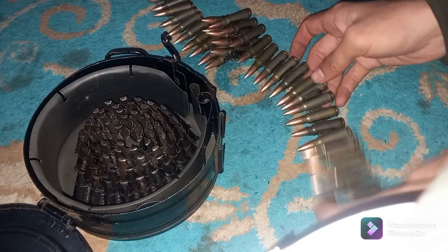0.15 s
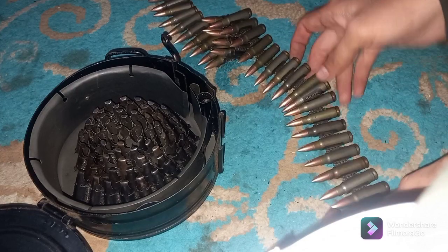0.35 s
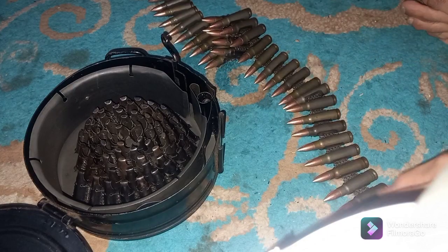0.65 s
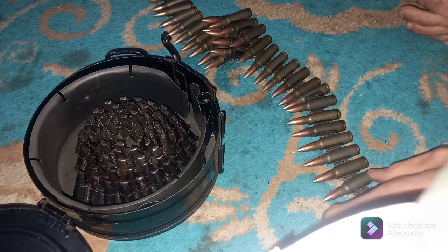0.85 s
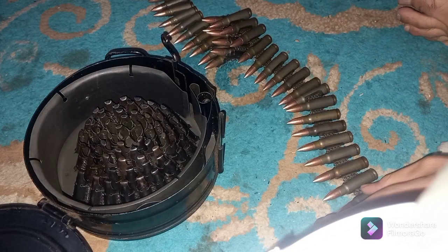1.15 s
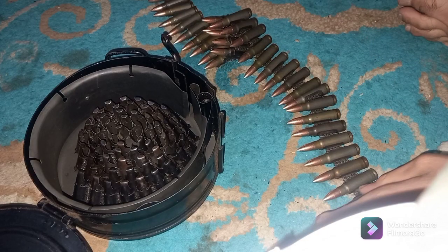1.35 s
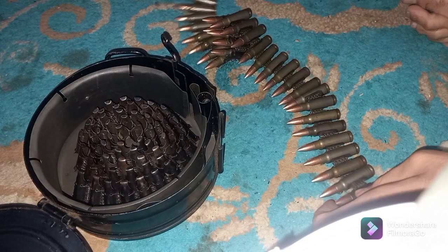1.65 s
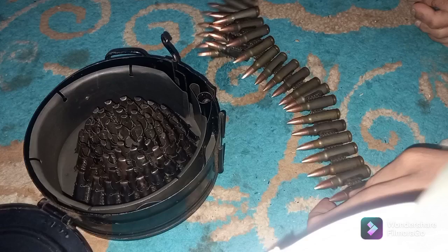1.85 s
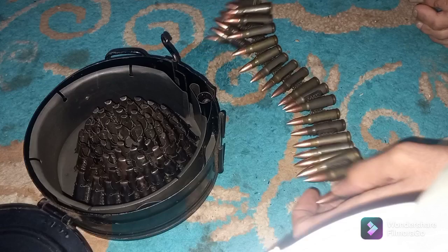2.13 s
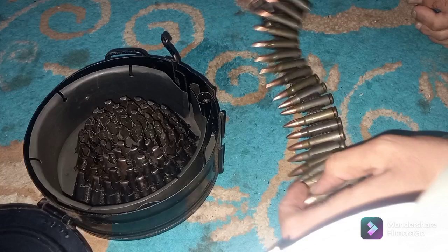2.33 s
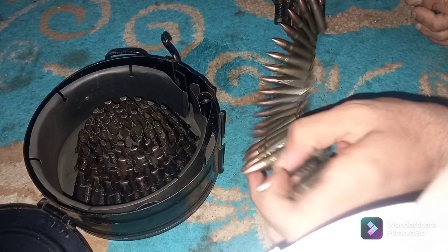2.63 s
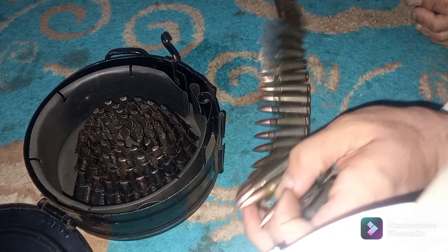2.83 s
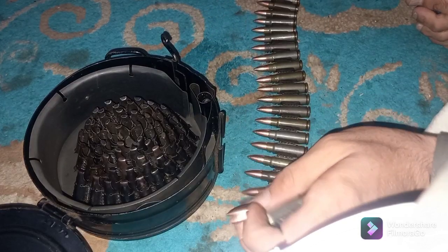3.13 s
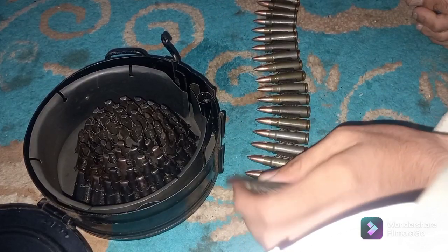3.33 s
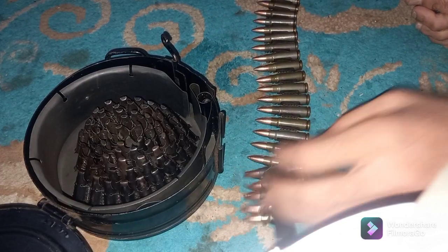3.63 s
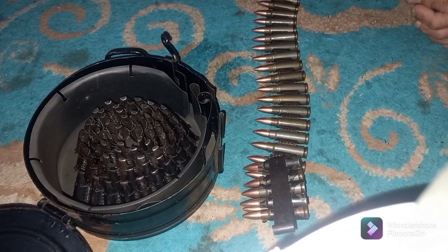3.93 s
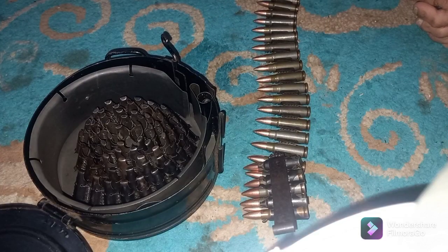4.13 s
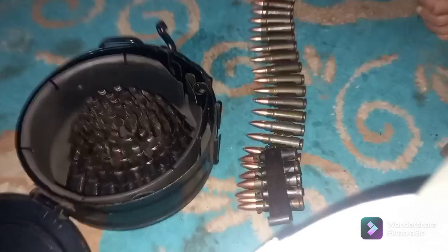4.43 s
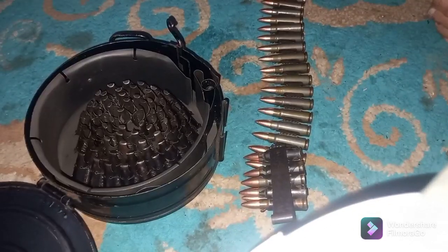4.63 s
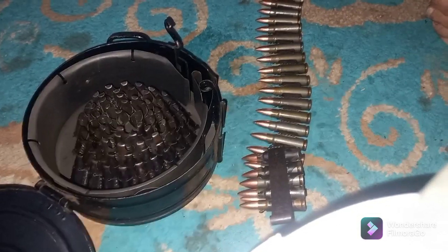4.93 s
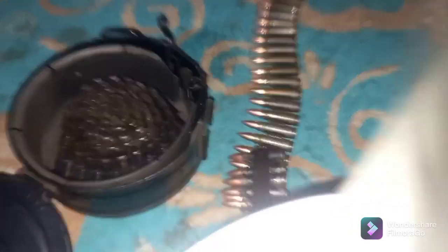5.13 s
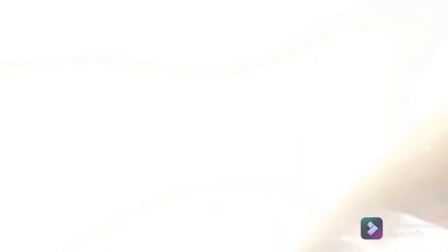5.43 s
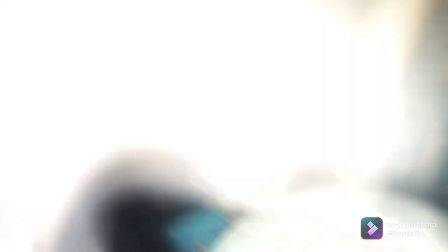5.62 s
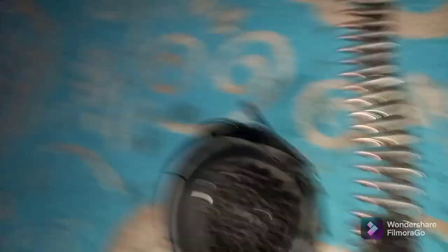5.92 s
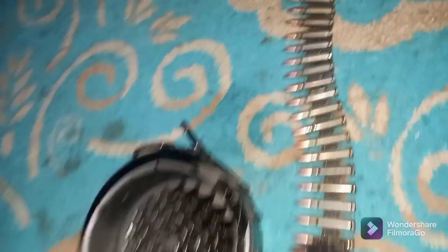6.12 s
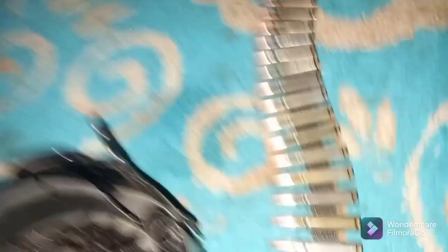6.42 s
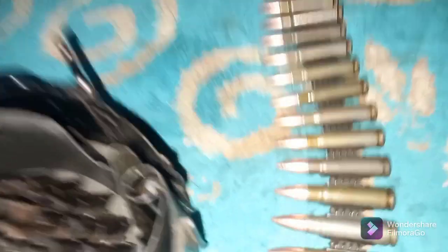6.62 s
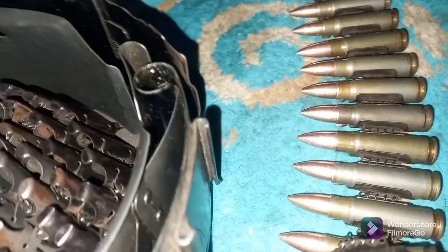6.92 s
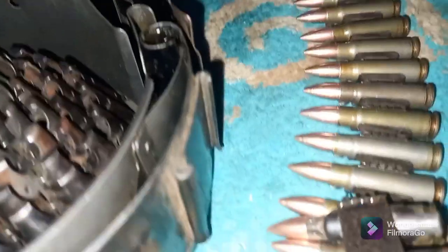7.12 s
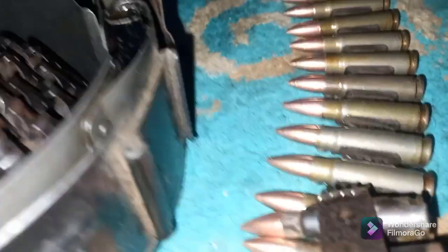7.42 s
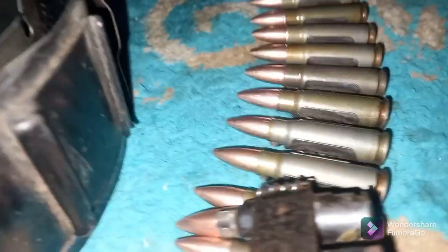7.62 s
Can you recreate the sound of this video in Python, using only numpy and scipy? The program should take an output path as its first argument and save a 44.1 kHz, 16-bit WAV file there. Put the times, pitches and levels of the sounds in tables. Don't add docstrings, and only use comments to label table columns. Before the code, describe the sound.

Sparse tiny metallic clinks grow into a jingling fold and soft carpet brush, before sharp plastic taps, thumps and scratchy handling, then quiet hum.

```python
import sys
import numpy as np
from scipy import signal
from scipy.fft import rfft, irfft
from scipy.io import wavfile

SR = 44100
rng = np.random.default_rng(int(sys.argv[2]) if len(sys.argv) > 2 else 0)


def bounce(signal):
    frames = np.transpose(np.atleast_2d(signal))
    limited = np.clip(frames, -1, 1)
    pcm = np.round(limited * 32767).astype(np.int16)
    wavfile.write(sys.argv[1], SR, pcm)


def natural_amplitude(level_db):
    exponent = np.asarray(level_db, float) / 20
    return 10 ** exponent


N = 342331
T = np.arange(N) / SR

# t/s, peak level/dB, shell f/Hz, link over shell level/dB, left minus right level/dB
DRAG_CLINKS = [(0.134, -73, 5900, -22, -12), (0.191, -68, 5600, 13.5, -25), (0.2765, -66, 6100, -6, -14),
               (0.2823, -56, 5700, -7, -13), (0.349, -74, 5740, -10, -12), (0.3013, -67, 5600, 11.5, -19),
               (1.1663, -69.5, 6400, -2, -4), (1.454, -64, 6700, 5.5, -5), (1.499, -63, 5340, 11.5, -7),
               (1.549, -73, 5030, 7, -2), (1.689, -71, 5440, 2, -4), (1.738, -72, 5900, 5, -13),
               (1.781, -62, 6540, 0, -17), (1.8255, -71, 6650, 8.5, -22), (1.877, -66, 6630, 4, -10),
               (1.977, -67.5, 6600, -6, -24), (1.993, -66.5, 5440, 3.5, -22), (2.125, -78, 6300, 2.5, -29),
               (2.239, -61.5, 6030, -30, -17), (2.42, -73, 5970, -2, -12), (2.467, -71, 5640, 4, -16),
               (2.49, -72, 5600, 6, -12), (2.64, -70, 5800, -15, -11), (2.78, -73, 4800, -20, -8),
               (2.0225, -74, 5560, 5, -12)]
FOLD_CLINKS = [(2.9183, -65.5, 6000, 1, -17), (2.945, -64, 5400, -21, -5), (2.971, -51.5, 5600, 4.5, -10.5),
               (2.983, -55.5, 5660, 4.5, -10), (2.9975, -57, 5850, 3.5, -14), (3.009, -68, 5340, -1, 4),
               (3.2253, -66.5, 5500, 4, -21), (3.275, -64.5, 5900, 7, -26), (3.288, -62, 4270, 4, 4),
               (3.2956, -56.5, 5370, 6.5, -10), (3.468, -71, 6080, -6, -21), (3.4991, -59.5, 6400, 2, -15),
               (3.5162, -57, 6400, 5.5, -9), (3.562, -58.5, 6130, 4, -11), (3.5946, -53, 4900, 1.5, -9.5),
               (3.651, -56, 4130, -2, 1), (3.657, -52.5, 5800, 3.5, -3), (3.6686, -49.5, 4000, 3, -1),
               (3.704, -55, 5110, 14, -7), (3.7186, -52.5, 4460, 16.5, -9.5),
               (3.736, -55.5, 5000, 7.5, -5.5), (3.756, -60, 4530, 2, 3), (3.789, -54, 4100, 7.5, -9.5),
               (3.9, -69.5, 4750, 6.5, -7), (3.9889, -65, 5990, -4, -12), (4.1261, -72, 5090, -6, -12),
               (4.1551, -68, 3300, -6, -9) , (4.188, -64, 5830, 1, -19)]
SQUARE_HIT_DB = 5.5
BELT_PAN_DB = -6


def unit(x):
    return x / np.sqrt(np.mean(x ** 2))


def peak(x, db):
    return x * natural_amplitude(db) / np.abs(x).max()


def band(x, hz, width, order=2):
    edges = np.clip([hz - width / 2, hz + width / 2], 20, .48 * SR)
    return signal.sosfilt(signal.butter(order, edges, "bandpass", fs=SR, output="sos"), x)


def on_log(table, hz):
    f, v = np.transpose(table)
    return np.interp(np.log(hz + 1), np.log(f), v)


def decay(t60, size):
    return np.exp(-np.log(1000) * np.arange(size) / SR / max(t60, 1 / 1000))


def ring(hz, t60, size):
    return np.sin(2 * np.pi * hz * np.arange(size) / SR) * decay(t60, size)


def burst(t60, size):
    return rng.standard_normal((2, size)) * decay(t60, size)


def sides(pan_db):
    return natural_amplitude(np.array([[1], [-1]]) * pan_db / 2)


def add(out, x, s, pan_db):
    i = int(s * SR)
    out[:, i:i + x.shape[-1]] += (x * sides(pan_db))[:, :N - i]


def grains(rate, spread_db, smear_s):
    happens = rng.random((2, N)) < rate / SR
    size_db = spread_db * np.minimum(rng.exponential(size=(2, N)), 4.5)
    tail = signal.lfilter([1], [1, -np.exp(-1 / (smear_s * SR))], happens * natural_amplitude(size_db))
    return unit(tail * rng.standard_normal((2, N)))


def swell(start, top, end, rise_db, fall_db, edge_s=0.0046):
    gain, span = np.zeros(N), slice(int(start * SR), int(end * SR))
    t = T[span]
    inside = np.clip(np.minimum(4 * (t - start), end - t) / edge_s, 0, 1)
    gain[span] = inside * natural_amplitude(np.interp(t, [start, np.clip(top, start, end), end], [-rise_db, 0, -fall_db]))
    return gain


def clinks():
    out = np.zeros((2, N))
    for s, db, shell_hz, link_db, pan_db in DRAG_CLINKS + FOLD_CLINKS:
        glancing = link_db < SQUARE_HIT_DB
        link_hz = 11110 * np.exp(0.13 * rng.uniform(-1.3, 2.3) * glancing)
        chatter = burst(0.021, size=1800)
        shell = signal.fftconvolve(chatter, ring(shell_hz, .008, size=900)[None])
        link = signal.fftconvolve(chatter, ring(link_hz, 0.0054, size=900)[None])
        crack = burst(0.0042, size=shell.shape[1])
        low = peak(shell, -3) + peak(band(crack, 5300, 3400, order=4), -3.5)
        low = band(low, 5500, 4400, order=3) + peak(band(crack, 1100, 1400), -33)
        top = peak(link, -4.5 - 5.5 * glancing) + peak(band(crack, 12060, 6800, order=3), -2.0)
        add(out, natural_amplitude(db + 10.5) * (natural_amplitude(2.0) * low + natural_amplitude(link_db) * top), s, pan_db)
    return out


def belt_body(x, lo, hi, rough_db):
    # f/Hz, width/Hz, level/dB
    belt_modes = [(3700, 170, -45), (5110, 35, 12), (5900, 820, 38), (9450, 150, -34), (10800, 320, -3),
                  (12100, 570, 21.5), (12900, 100, 10), (13730, 110, -28), (14300, 30, -19),
                  (14400, 1100, 19)]
    modes = sum(natural_amplitude(db) * band(x, hz, width, order=1) * np.sqrt(500 / width)
                for hz, width, db in belt_modes if lo < hz < hi)
    rattle = unit(band(x, (lo + hi) / 2, hi - lo, order=2))
    return unit(unit(modes) + natural_amplitude(rough_db) * rattle)


def jingle():
    # start t/s, strongest t/s, end t/s, level/dB, links over shells level/dB
    moves = [(0.187, 0.195, 0.26, -74, 4), (0.272, 0.285, 0.38, -70, 2), (1.44, 1.455, 1.64, -78, 3),
             (1.6, 1.74, 1.775, -72, 0), (1.775, 1.82, 1.86, -69, 2), (1.7, 1.9, 2.2, -72, -14),
             (1.868, 1.88, 1.895, -66, 0), (1.96, 1.99, 2.02, -66, -2), (2.0, 2.29, 2.42, -68, -10),
             (2.39, 2.482, 2.62, -70, -2), (2.55, 2.88, 2.91, -70, -20), (2.91, 2.984, 3.03, -61, 0),
             (3.0, 3.02, 3.12, -70, -6), (3.2, 3.235, 3.27, -64, -1), (3.27, 3.3, 3.35, -60, 0),
             (3.494, 3.5, 3.63, -64, 2), (3.615, 3.655, 3.69, -57, 2), (3.7, 3.73, 3.78, -60, -2),
             (3.81, 3.825, 3.85, -68, 4), (4.165, 4.196, 4.23, -60, 5)]
    # start t/s, strongest t/s, end t/s, level/dB
    brushes = [
        (2.252, 2.605, 2.92, -80),
    ]
    patter = grains(rate=900, spread_db=3.0, smear_s=0.0022)
    low, top = belt_body(patter, 3200, 8130, 0.17), belt_body(patter, 8300, 18000, 6.0)
    shakes = [(s, s, s + 0.025, db - 17, min(link_db, 4))
              for s, db, _, link_db, _ in DRAG_CLINKS + FOLD_CLINKS]
    shells = links = 0
    for start, most, end, db, link_db in moves + shakes:
        move = swell(start, most, end, 11, 13.5) * natural_amplitude(db)
        shells, links = shells + move, links + move * natural_amplitude(link_db)
    press = sum(swell(start, most, end, 4.4, 3.9) * natural_amplitude(db) for start, most, end, db in brushes)
    pile = press * unit(band(patter, 1300, 1500))
    return sides(BELT_PAN_DB) * (natural_amplitude(-0.5) * shells * low + natural_amplitude(-3.5) * links * top + pile)


def skid():
    scrape = (3.618, 3.66, 3.695, -56, 4450, 3550, 450)
    start, most, end, db, first_hz, last_hz, width = scrape
    hz = np.interp(T, [start, end], [first_hz, last_hz])
    lowpass = signal.butter(2, width / 2, fs=SR, output="sos")
    grit = unit(signal.sosfilt(lowpass, rng.standard_normal((2, N))))
    return swell(start, most, end, 5.5, 3.5) * natural_amplitude(db) * grit * np.sin(2 * np.pi * np.cumsum(hz) / SR)


def drag():
    slides = [
        (1.62, 1.85, 1.5, -77),
        (2.053, 2.3, 3.2, -78),
        (2.5, 2.748, 2.98, -84),
        (3.0, 3.05, 3.22, -86),
    ]
    hiss = unit(band(grains(rate=5000, spread_db=6.0, smear_s=0.0035), 5700, 3300, order=3))
    press = sum(swell(start, most, end, 7.3, 12.0, edge_s=0.046) * natural_amplitude(db) for start, most, end, db in slides)
    return sides(BELT_PAN_DB) * press * hiss


def sweep():
    strokes_away = [
        (3.65, 3.75, 3.8, -68),
        (3.783, 3.964, 4.06, -65),
        (4.038, 4.173, 4.26, -70.5),
    ]
    # f/Hz, width/Hz, level/dB
    pile_bands = [(707, 210, -10), (1250, 530, -6.5), (2830, 1300, -11), (5000, 4230, 2),
                  (12370, 7700, -6.5)]
    fibres = grains(rate=5200, spread_db=-4.0, smear_s=0.003)
    wash = unit(sum(natural_amplitude(db) * unit(band(fibres, hz, width)) for hz, width, db in pile_bands))
    press = sum(swell(start, most, end, 6.4, 6.5, edge_s=0.036) * natural_amplitude(db)
                for start, most, end, db in strokes_away)
    return sides(-11.5) * press * wash


def cavities(slip, port):
    return [natural_amplitude(db) * unit(band(slip, hz, width, order=3)) for hz, width, db in port]


def rub():
    # f/Hz, width/Hz, level/dB
    left_port = [(4380, 1465, 0.5), (2030, 1500, -5), (12400, 5600, -28)]
    right_port = [(4800, 2300, -12), (1790, 2500, 0), (11900, 6700, -10)]
    # start t/s, firmest t/s, end t/s, level/dB, left minus right level/dB
    strokes = [(4.5, 4.6, 4.638, -51.5, 10), (4.71, 4.75, 4.795, -63, -12), (4.828, 4.845, 4.865, -62, -12),
               (4.88, 4.936, 4.975, -69, -8), (4.975, 4.992, 5.012, -59, 8), (5.03, 5.04, 5.08, -65, -6),
               (4.6, 4.66, 5.08, -75, 0), (5.57, 5.6, 5.72, -76, 8), (5.71, 5.72, 5.76, -73, 12),
               (5.775, 5.8, 5.86, -61, 16), (5.843, 5.855, 5.935, -61, 16), (6.235, 6.26, 6.285, -70, 15)]
    grips = [(4.451, 4.453, 4.48, -46, 16), (4.47, 4.48, 4.525, -50, -10), (4.683, 4.686, 4.7, -60, -6),
             (5.15, 5.185, 5.25, -49, 19), (5.285, 5.3, 5.37, -52, 22), (5.487, 5.495, 5.53, -41, 15),
             (5.843, 5.86, 5.92, -64, 8), (5.922, 5.935, 6.03, -46, 10), (6.01, 6.034, 6.06, -50, 17),
             (6.056, 6.07, 6.13, -45.5, 4), (6.1, 6.16, 6.19, -62, 0)]
    # t/s, pressure as level/dB, left minus right level/dB
    palm_slide = [
        (5.076, -58.5, 16),
        (5.1, -48.5, 18),
        (5.125, -40.5, 12.5),
        (5.185, -42, 12.5),
        (5.275, -47, 14),
        (5.3, -49.5, 17.5),
        (5.41, -40.5, 8.5),
        (5.46, -54.5, 17),
        (5.51, -61.5, 20),
        (5.58, -54.5, 18.5),
    ]
    # rise/dB, fall/dB, case over cavity/dB, rumble over cavity/dB
    light, firm = (10, 11, -6.5, -20.5), (13, 22.7, 4.3, 4)

    slip = grains(rate=9600, spread_db=1.5, smear_s=0.0051)
    rumble = unit(band(rng.standard_normal((2, N)), 100, 240)) * natural_amplitude(np.array([[3.0], [-6.0]]))
    ports = np.stack([cavities(slip[0], left_port), cavities(slip[1], right_port)], axis=1)
    judder_db = 2.5 * unit(band(rng.standard_normal((3, 1, N)), 55.07, 70))
    cavity, case, air = ports * natural_amplitude(judder_db)
    air = air * natural_amplitude(np.where(T > 5.57, -6, 0))
    cavity[1] += natural_amplitude(-2.0) * unit(band(slip[1], 5550, 500))
    case[1] += natural_amplitude(-7.5) * unit(band(slip[1], 2200, 510))

    s, db, pan_db = np.transpose(palm_slide)
    palm = swell(s[0], s[0], s[-1], 0, 0) * natural_amplitude(np.interp(T, s, db))
    out = palm * sides(np.interp(T, s, pan_db)) * (cavity + air + natural_amplitude(-4) * case)
    shake = palm * natural_amplitude(-7)
    for touches, (rise_db, fall_db, case_db, rumble_db) in ((strokes, light), (grips, firm)):
        for start, most, end, db, pan_db in touches:
            press = swell(start, most, end, rise_db, fall_db) * natural_amplitude(db)
            out = out + press * sides(pan_db) * (cavity + air + natural_amplitude(case_db) * case)
            shake = shake + press * natural_amplitude(rumble_db)
    keep = np.exp(-1 / (0.023 * SR))
    return out + signal.lfilter([1 - keep], [1, -keep], shake) * rumble


def knocks():
    # t/s, peak level/dB, case f/Hz, dull body relative level/dB, left minus right level/dB
    taps = [(4.4504, -10.5, 4598, -52, 10.5), (4.4757, -28.5, 6000, -2.5, 2.5),
            (4.4835, -37, 1520, -3, 7.5), (4.4893, -39, 3200, -4, 9), (4.527, -29, 4200, -12, -0.5),
            (4.683, -31.5, 5500, -33, 2), (4.83, -49, 5560, -21, 8), (4.9781, -49.5, 4100, -10, 11.5),
            (5.033, -47, 5630, -19, 9.5), (5.077, -46, 4100, -13, 21), (5.1823, -26.5, 3820, -17, 22),
            (5.2815, -25, 1640, -1.5, -6.5), (5.2875, -24, 4200, -38, 15), (5.303, -26.5, 3680, -13, 13.5),
            (5.3297, -38, 4380, 6.5, 11), (5.391, -28, 5030, -40, 25.5), (5.4888, -23, 2200, -14.5, 10.5),
            (5.4928, -27, 3250, -19, 10), (5.517, -42, 4070, -1, 16), (5.2131, -28.5, 4000, -15, 19),
            (5.9207, -18, 4610, -9.5, 18), (5.9245, -17.5, 3720, -9.5, 13.5),
            (5.9853, -42.5, 1600, 4.5, -2), (6.0196, -36.5, 4570, -17.5, 19.5),
            (6.032, -31, 3870, -20, 12.5), (6.044, -40.5, 5500, -20, 11.5), (6.067, -26, 4500, -19.5, 6.5),
            (6.085, -28.5, 4800, -5.5, 9), (6.0552, -17.5, 2150, -1.5, 2), (6.0996, -31, 3650, -1.5, -3),
            (6.1236, -39, 1310, -1.5, 3), (6.1539, -45.5, 1500, 5, -4)]
    out = np.zeros((2, N))
    for s, db, case_hz, body_db, pan_db in taps:
        t60 = 0.004 if body_db < -24 else 0.02
        crack = burst(t60, size=3000)
        case = signal.fftconvolve(burst(0.72 * t60, size=1000), ring(case_hz, 1.2 * t60, size=2001)[None])
        parts = peak(case, -6.5) + peak(band(crack, 3056, 3700, order=3), -2.0)
        top = peak(band(crack, 12000, 12000, order=3), -36.0) * sides(-8)
        body = peak(band(crack[:1], 560, 980), body_db)
        add(out, natural_amplitude(db) * (parts + top + body), s, pan_db)
    return out


def nail_snap():
    # t/s, peak level/dB, left minus right level/dB
    flick = (5.390, -23, -7)
    s, db, pan_db = flick
    out = np.zeros((2, N))
    add(out, peak(band(burst(0.0075, size=2000), 13000, 14000), db), s, pan_db)
    return out


def pings():
    # t/s, f/Hz, peak level/dB, t60/s, left minus right level/dB
    ping_modes = [(4.4501, 4520, -18, 0.003, 10.5), (4.683, 1480, -41, 0.008, -4),
                  (4.84, 2180, -58.5, 0.03, -10), (4.73, 2180, -64, 0.1, -8),
                  (5.9223, 2200, -26, 0.008, 14), (6.126, 1330, -44, 0.01, 3),
                  (4.4506, 1820, -18, 0.0045, 13), (4.453, 1890, -50.5, 0.011, 9.5),
                  (4.4744, 5670, -24.5, 0.012, -18.5), (4.69, 854, -56, 0.067, 7),
                  (5.176, 1430, -36, 0.039, 15), (5.394, 2450, -37, 0.019, 16),
                  (6.056, 2170, -30, 0.016, 2), (6.056, 6100, -28, 0.0078, -6),
                  (5.738, 2280, -67.5, 0.25, -6.5), (2.971, 5600, -37, 0.0025, -3),
                  (3.719, 4300, -40, 0.0046, 7), (3.7888, 3870, -37.5, 0.0027, 5),
                  (5.392, 3580, -51, 0.11, -14.5), (5.495, 3430, -49, 0.2, 10),
                  (5.612, 2240, -71.5, 0.5, -5.5), (6.102, 3530, -51, 0.19, -3.5),
                  (6.103, 6530, -50, 0.098, -9)]
    out = np.zeros((2, N))
    for s, hz, db, t60, pan_db in ping_modes:
        waver = unit(band(rng.standard_normal(12000), 70, 110))
        flutter = 1 - min(t60, .8) + (.2 + t60) * waver
        add(out, natural_amplitude(db) * (flutter * ring(hz, t60, size=12000))[None], s, pan_db)
    return out


def thumps():
    # t/s, peak level/dB, f/Hz, t60/s, left minus right level/dB
    jolts = [(0.28, -48, 410, 0.01, -5), (2.994, -46.5, 69.6, 0.011, -2), (2.993, -42, 520, 0.0023, -5),
             (4.474, -43.5, 100.4, 0.12, 35), (5.185, -32, 99.6, 0.28, 19),
             (5.282, -25.5, 255, 0.011, 14.5), (5.49, -38, 604, 0.016, 10), (5.2862, -20, 108.7, 0.077, 18),
             (5.345, -34, 84, 0.23, 14), (5.451, -47, 483, 0.05, 1), (5.387, -34.5, 76.8, 0.097, 23.5),
             (5.488, -63, 184, 0.065, 3.5), (5.658, -47, 206, 0.053, 0), (5.658, -52, 580, 0.019, -1),
             (5.855, -50.5, 110, 0.086, 13.5), (5.922, -27.5, 89, 0.078, 15.5),
             (5.924, -36.5, 300.6, 0.045, 3.5), (5.922, -26.5, 1390, 0.021, 10.5),
             (6.033, -23.5, 99, 0.14, 22), (6.057, -18, 181, 0.1, 3), (6.079, -22.5, 113, 0.072, 14),
             (6.085, -31.5, 215, 0.12, -3), (6.126, -39, 720, 0.033, 1), (5.93, -34, 96, 0.15, 15),
             (6.127, -34, 127.8, 0.23, -7.5)]
    out = np.zeros((2, N))
    for s, db, hz, t60, pan_db in jolts:
        rock = ring(hz, t60, size=9000) * np.array([[1], [-1]]) ** (s > 5 and hz < 140)
        second = natural_amplitude(-2.0) * ring(2.0 * hz, 0.091 * t60, size=9000)
        sixth = natural_amplitude(-14.5) * ring(6.0 * hz, 0.14 * t60, size=9000)
        onset = 1 - np.exp(-T[:9000] * hz / 0.083)
        add(out, peak((rock + second + sixth) * onset, db - 0.5), s, pan_db)
    return out


def room():
    # f/Hz, level/dB per Hz
    floor = [(15, -46), (25, -14), (60, 1), (220, -8), (400, -10), (700, -22), (1000, -27), (1600, -33.5),
             (3600, -42.5), (5300, -35.5), (6700, -33), (9500, -40), (13000, -37), (16500, -36)]
    # f/Hz, width/Hz, level over the floor/dB
    hums = [(78, 3.3, 11), (232.1, 6.1, 13.5), (280, 39, -7.5), (417, 2.1, -5), (694, 11, 12.5)]
    # f/Hz, coherence 0-1
    likeness = [(60, 0.6), (130, 0), (290, 0.02), (640, 0), (1410, 0.88), (3100, 1), (6820, 0.7),
                (15000, 0.01)]
    # f/Hz, left minus right level/dB
    lean = [(60, 0), (110, -0.5), (200, -2), (380, -1), (700, 0.5), (1290, -0.5), (2380, -27),
            (4400, -30.5), (8120, -9.5), (15000, 5)]
    hz = np.arange(N // 2 + 1) * SR / N
    hum = sum(natural_amplitude(db) / (1 + (2 * (hz - f) / width) ** 2) for f, width, db in hums)
    like = np.clip(on_log(likeness, hz), 0, 1)
    mid, side = rfft(rng.standard_normal((2, N)))
    sign = np.array([[1], [-1]])
    ports = (np.sqrt(1 + like) * mid + sign * np.sqrt(1 - like) * side) * sides(on_log(lean, hz))
    return unit(irfft(ports * natural_amplitude(on_log(floor, hz)) * (.6 + .4 * hum), N)) * natural_amplitude(-66)


def drone():
    # t/s, level/dB
    loudness = [
        (0, -93),
        (6.4, -85.5),
        (6.9, -77.5),
        (7.76, -67.5),
    ]
    haze = unit(band(rng.standard_normal(N), 410, 80))
    return natural_amplitude(np.interp(T, *np.transpose(loudness))) * (np.sin(2 * np.pi * 404 * T) + 0.5 * haze)


def scene():
    belt = clinks() + jingle() + skid() + sweep() + drag()
    tail = signal.fftconvolve(belt, burst(.12, size=9000), axes=1)[:, :N]
    handling = knocks() + nail_snap() + pings() + thumps() + rub()
    return belt + natural_amplitude(-42) * tail + handling + room() + drone()


def top_cut(x):
    return signal.sosfilt(signal.butter(12, 17000, fs=SR, output="sos"), x)


def record(dry):
    steady = signal.sosfilt(signal.butter(3, 55, "highpass", fs=SR, output="sos"), dry)
    dipped = steady - .75 * band(steady, 7720, 2400, order=1)
    gap = signal.sosfiltfilt(signal.butter(4, (7050, 7650), "bandpass", fs=SR, output="sos"), dipped)
    dipped = dipped - (1 - natural_amplitude(-6)) * gap
    cut = signal.sosfilt(signal.ellip(8, .5, 22, 15900, fs=SR, output="sos"), dipped)
    return top_cut(cut)


dry = scene()
out = record(dry)
bounce(out)
```